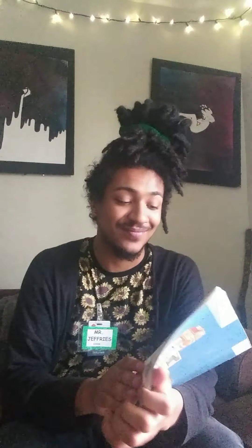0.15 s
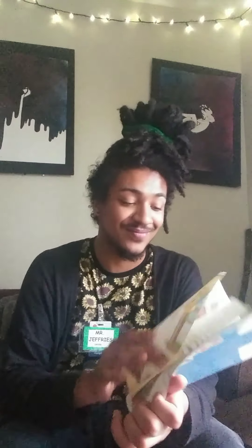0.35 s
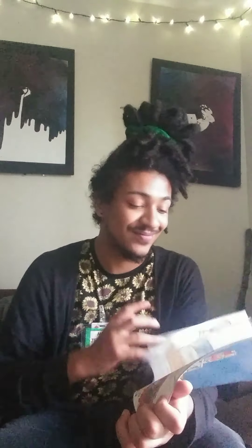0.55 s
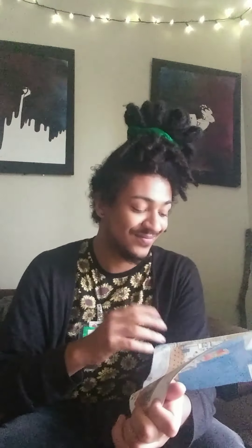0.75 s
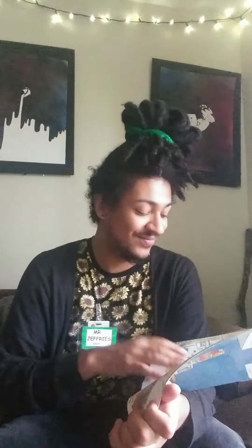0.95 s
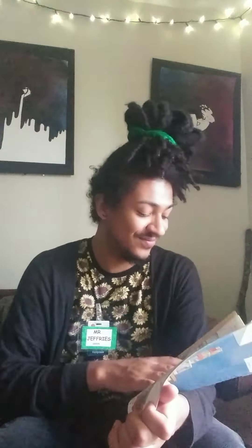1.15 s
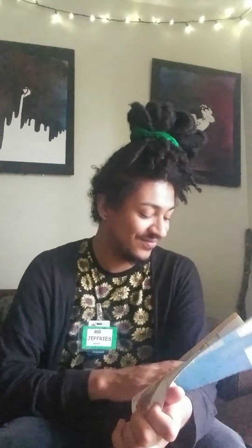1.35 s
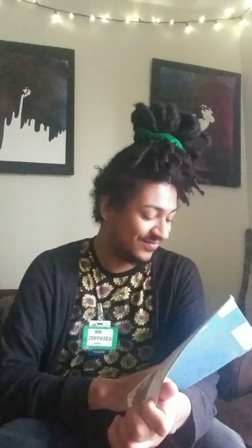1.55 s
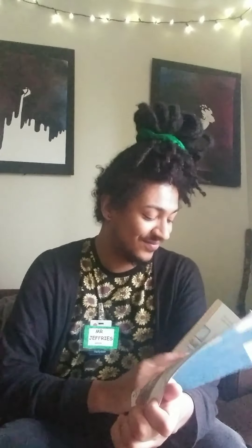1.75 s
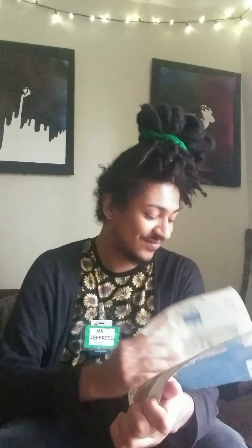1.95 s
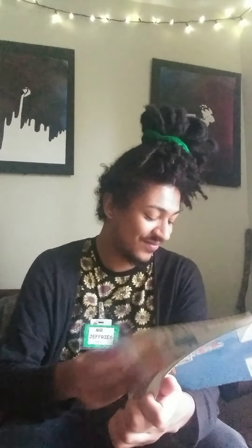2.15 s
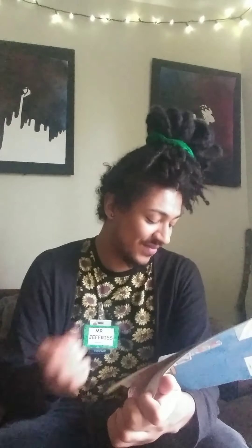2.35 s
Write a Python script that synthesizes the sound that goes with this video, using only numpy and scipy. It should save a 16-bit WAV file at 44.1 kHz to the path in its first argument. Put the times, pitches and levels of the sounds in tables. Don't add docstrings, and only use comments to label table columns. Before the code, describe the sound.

Thin book pages rustle and flap over by hand, pause with faint fingertip brushing, then a second quicker turn ends in a sharp flat crack and smoothing; small quiet room, close single microphone, low room rumble.

```python
import sys
import numpy as np
from scipy import signal
from scipy.io import wavfile
from scipy.ndimage import uniform_filter1d

SR = 44100
rng = np.random.default_rng(int(sys.argv[2]) if len(sys.argv) > 2 else 0)


def master(y):
    cut = np.clip(np.atleast_2d(y).T, -1, 1)
    pcm = np.round(cut * 32767)
    wavfile.write(sys.argv[1], SR, pcm.astype(np.int16))


def voltage_ratio(decibels):
    exponent = np.asarray(decibels, float) / 20
    return 10 ** exponent


N = 110250


def evened(x):
    return x / np.sqrt(np.mean(x ** 2) + 1e-20)


def read(points, hz):
    f, value = np.transpose(points)
    return np.interp(np.log(hz + 1), np.log(f + 1), value)


def coloured(x, points):
    size = 4096
    log_gain = np.log(voltage_ratio(read(points, abs(np.fft.fftfreq(size, 1 / SR)))))
    minimum_phase = np.exp(np.conj(signal.hilbert(log_gain)))
    taps = np.fft.ifft(minimum_phase).real[:size // 2]
    return signal.oaconvolve(x, taps)[:len(x)]


def resonate(x, hz, width_hz):
    b, a = signal.iirpeak(min(hz, SR / 2.2), max(hz / width_hz, 0.3), SR)
    return signal.lfilter(b, a, x)


def add(mix, s, sound):
    part = mix[round(s * SR):][:len(sound)]
    part += sound[:len(part)]


def slips():
    slips_per_s, spread_db = 9000, 1.5
    clump_s, clump_db = 0.0053, 1
    size = voltage_ratio(spread_db * np.minimum(rng.exponential(1, N), 2.6))
    size = size * rng.choice([-1., 1.], N)
    clump = evened(uniform_filter1d(rng.standard_normal(N), max(round(clump_s * SR), 2)))
    happens = rng.random(N) < slips_per_s / SR
    return size * happens * voltage_ratio(clump_db * clump)


def rubbing():
    # frequency in Hz, level in dB.
    rub_colour = [(400, 0.5), (1000, -1), (2000, -13.5), (4000, -4), (7000, 6.5), (10000, -1.5),
                  (13000, -9), (16000, -26)]
    flex_colour = [(400, -56), (900, -18), (1600, -5), (2600, -2.5), (3600, -1), (5500, -4.5), (9000, -27),
                   (16000, -21)]
    flap_colour = [(120, -17), (250, 17), (500, -19), (900, 13), (1500, 13), (2500, 1), (5000, -55)]
    # time in seconds, rubbing level in dB, sheet flex in dB, slack flap in dB.
    first_turn = [
        [(.114, -78.5, 5, 11), (.174, -51, 3, 9), (.204, -47, 2.5, -4), (.245, -49.5, 4.5, 14),
         (.33, -44, -1, 10), (.39, -39.5, -0.5, 0), (.47, -41, -0.5, -2), (.53, -38.5, 0, 4),
         (.548, -43.5, -2.5, 1)],
        [(.548, -43.5, -7, 8), (.585, -37.5, 1.5, 14), (.65, -41.5, 3.5, 15.5), (.685, -45, 6, -11),
         (.716, -40, 2, 15), (.75, -50, 3.5, 14), (.8, -60, 4.5, -10), (.9, -79, 3, 8)],
    ]
    fingering = [
        [(1.048, -73, 0, -5), (1.056, -57.5, -0.5, 7), (1.098, -58.5, -0.5, 8), (1.13, -65, -1, -3)],
        [(1.138, -68, 14, 0), (1.151, -51.5, 10.5, 17), (1.203, -66.5, 0.5, 2), (1.239, -66, 9, -3),
         (1.3, -100, -4, -5)],
        [(1.312, -61.5, 3.5, 17.5), (1.44, -69.5, -3, -3), (1.512, -58, -1, 9), (1.558, -65.5, 0, 4),
         (1.59, -53.5, 5.5, 2), (1.66, -62.5, 2, 0), (1.68, -57, -1, 6)],
    ]
    second_turn = [
        [(1.68, -61, -3, -1), (1.712, -43.5, 1.5, 6.5), (1.782, -43.5, 3.5, -6), (1.84, -40.5, 1, 6),
         (1.876, -37.5, 6.5, -2), (1.935, -53, 0.5, 17), (1.968, -48.5, 4, 2), (1.99, -51.5, 3, 27.5),
         (2.058, -66, 7.5, -9)],
        [(2.066, -55, -1, -6), (2.1, -46, 6.5, -1), (2.137, -46, 2.5, -13), (2.159, -40, -1.5, -9),
         (2.215, -45, -1.5, 19), (2.28, -59, 1, 2), (2.4, -94, -.5, -6)],
    ]
    flex_base_db, flap_base_db = -3, -17

    t, out = np.arange(N) / SR, np.zeros(N)
    hiss = evened(coloured(slips(), rub_colour))
    body = evened(coloured(slips(), flex_colour))
    flap = evened(coloured(slips(), flap_colour))
    air = signal.sosfiltfilt(signal.butter(3, 9300, "high", fs=SR, output="sos"), hiss)
    for stroke in first_turn + fingering + second_turn:
        s, level_db, flex_db, flap_db = np.transpose(stroke)
        gain = voltage_ratio(np.interp(t, s, level_db, left=-120, right=-120))
        air_db = np.interp(t, s, 0.34 * (level_db + 59) - 0.74 * flex_db)
        bright = hiss + (voltage_ratio(air_db) - 1) * air
        bending = voltage_ratio(flex_base_db + np.interp(t, s, flex_db)) * body
        flapping = voltage_ratio(flap_base_db + np.interp(t, s, flap_db)) * flap
        out += gain * (bright + bending + flapping)
    return out


def snap(peak_db, hz, length, crack_db):
    size, clicks_per_s = 4000, 7000
    sheet_q, snap_db = 1.55, 0.5
    t = np.arange(size) / SR
    clicks = rng.standard_normal(size) * (rng.random(size) < clicks_per_s / SR)
    clicks = clicks + 3 * (t == 0)
    clicks = clicks * np.exp(-t / max(length, 0.0005))
    sheet = resonate(clicks, hz, hz / sheet_q)
    sheet = resonate(sheet, hz, 2 * hz / sheet_q)
    crack = signal.lfilter(*signal.butter(2, [2600, 7850], "band", fs=SR), clicks)
    both = sheet / abs(sheet).max() + voltage_ratio(crack_db) * crack / abs(crack).max()
    return voltage_ratio(snap_db + peak_db) * both


def pulse(hz, cycles):
    turns = np.arange(2000) / SR * hz
    ring = -np.sin(2 * np.pi * turns) * turns * np.exp(-turns / cycles)
    return ring / abs(ring).max()


def thumps():
    # start in seconds, peak in dB, pitch in Hz.
    puffs = [(.266, -49.5, 380), (.509, -47, 630), (.574, -47, 600), (.627, -37, 510), (1.059, -51.5, 490),
             (1.139, -45.5, 226), (1.146, -49.5, 490), (1.18, -56, 426), (1.605, -50, 510),
             (1.715, -43, 356), (1.858, -34, 617), (1.975, -37, 513), (2.07, -45, 250), (2.211, -46.5, 570),
             (1.69, -48, 215), (1.995, -47, 202), (0.644, -46.5, 177), (2.085, -40, 760)]
    out = np.zeros(N)
    for s, peak_db, hz in puffs:
        add(out, s, voltage_ratio(3.5 + peak_db) * pulse(hz, 0.79))
    return out


def slaps():
    # start in seconds, peak in dB, pitch in Hz.
    cracks = [
        (2.0640, -19, 4500),
        (2.0643, -15, 1250),
        (2.0648, -13, 4800),
        (2.0652, -16, 7800),
        (2.0655, -18, 2700),
        (2.0745, -23, 3000),
        (1.9746, -27, 1300),
        (1.9750, -28, 5200),
    ]
    out = np.zeros(N)
    for s, peak_db, hz in cracks:
        add(out, s, voltage_ratio(peak_db) * pulse(hz, 0.5))
    return out


def corner_ticks():
    # start in seconds, peak in dB.
    catches = [
        (2.4838, -50),
        (2.4868, -38),
        (2.4884, -45),
        (2.4905, -36),
        (2.4938, -44),
        (2.4968, -43),
    ]
    out, size = np.zeros(N), 4000
    fade = np.exp(-np.arange(size) / SR / 0.00066)
    for s, peak_db in catches:
        tick = resonate(rng.standard_normal(size) * fade, 9450, 860)
        add(out, s, voltage_ratio(peak_db) * tick / abs(tick).max())
    return out


def buckles():
    # start in seconds, peak in dB, sheet pitch in Hz, burst
    # length in seconds, crack in dB.
    snaps = [(0.267, -29.5, 1040, 0.0056, 1), (.335, -25.5, 1180, 0.012, -2),
             (0.337, -26, 2600, 0.0075, -8), (0.4213, -30, 1260, 0.01, -22),
             (0.511, -31.5, 890, 0.025, -17), (0.574, -26.5, 900, 0.015, -21),
             (0.58, -24, 3300, 0.0073, -2), (.628, -33, 800, 0.01, 12.5),
             (.59, -29.5, 840, 0.064, -18), (0.726, -26, 2400, 0.0084, -3),
             (1.05, -59, 2500, 0.037, 6), (1.139, -37.5, 1160, 0.0066, 3.5),
             (1.155, -51, 3430, 0.005, -9), (1.318, -44.5, 2730, 0.048, -17),
             (1.603, -40.5, 1480, 0.011, 1),
             (1.71, -38, 910, 0.0035, -24), (1.768, -29, 3300, 0.0061, -14),
                  (1.8545, -25, 1790, 0.0043, -7), (1.867, -24, 1900, 0.003, -16),
                  (1.876, -36, 3930, 0.004, -3), (1.9825, -28, 3400, 0.0036, -4),
                  (2.061, -29, 2830, 0.01, -25), (2.201, -31, 1110, 0.021, -16),
                  (2.212, -29, 1170, 0.017, -16), (2.207, -30.5, 2600, 0.0097, -16),
                  (2.324, -43, 960, 0.0033, -25), (2.326, -40, 2660, 0.0038, -15)]
    out = thumps() + slaps()
    for s, peak_db, hz, length, crack_db in snaps:
        add(out, s, snap(peak_db, hz, length, crack_db))
    out = signal.sosfilt(signal.butter(2, 9000, fs=SR, output="sos"), out)
    return out + corner_ticks()


def pings():
    # start in seconds, peak in dB, pitch in Hz, length in cycles.
    patches = [(.2655, -43, 750, 0.88), (.271, -37.5, 1070, 1.2), (.279, -40, 1390, 3),
               (.294, -43, 1470, 3.7), (.345, -34.5, 2470, 3.9), (.346, -33.5, 3070, 4.6),
               (.352, -39, 1220, 2.7), (.364, -37, 1530, 3), (.509, -38, 500, 0.49), (.519, -37, 890, 1.5),
               (.529, -38, 704, 1.9), (.575, -26.5, 2320, 1.5), (.581, -36, 1070, 1.1),
               (.624, -37.5, 700, 1.9), (.696, -39.5, 583, 1.1), (.727, -36.5, 1290, 0.95),
               (.728, -31, 4030, 3.2), (1.772, -34.5, 1800, 1.5), (1.8575, -24, 3700, 2.2),
               (1.9748, -28, 3020, 0.83), (2.206, -40, 3230, 1.6), (2.218, -41, 2450, 1.6),
               (0.42, -36, 1900, 1.1), (0.426, -27.5, 1280, 1.2), (.432, -34, 1160, 1.5),
               (0.4496, -39, 1420, 1.7), (.340, -35, 1240, 1.6), (.5825, -28, 4220, 3.8),
               (.585, -28.5, 3570, 3.4), (.587, -33, 1110, 0.66), (0.6073, -41, 1290, 1.5),
               (0.64, -33, 1630, 0.81), (.714, -39, 2330, 1.8), (1.051, -53, 436, 1.2),
               (1.059, -52, 2410, 3.1), (1.081, -54, 2600, 4.4), (1.087, -56, 2550, 4.6),
               (1.098, -59, 2530, 7.3), (1.186, -45.5, 820, 1.1), (1.317, -50, 2776, 7),
               (1.347, -58, 2520, 15), (1.576, -49, 4650, 3), (1.8667, -23, 3800, 1.8),
               (1.868, -34, 5300, 4.4), (1.882, -29, 4040, 5.3), (1.9758, -30, 1880, 1.3),
               (1.986, -32, 1260, 0.89), (1.987, -32.5, 3800, 3.3), (2.0717, -21.5, 2675, 2.9),
               (2.074, -23, 4330, 3.3)]
    out = np.zeros(N)
    for s, peak_db, hz, cycles in patches:
        add(out, s, voltage_ratio(peak_db) * pulse(hz, max(cycles, 0.3)))
    return out


def reply(walls_db):
    # delay in seconds, smear in seconds, level in dB.
    walls = [
        (.002, .002, -12),
        (.0078, .006, -7),
        (.019, .016, -14),
    ]
    # frequency in Hz, time to fall 60 dB in seconds.
    decay = [(300, 0.31), (1000, 0.21), (3000, 0.27), (8000, 0.19), (14000, 0.25)]
    size, tail_db = SR // 2, -13
    t = np.arange(size) / SR
    hz, frames, z = signal.stft(rng.standard_normal(size), SR, nperseg=256)
    fading = z * voltage_ratio(-60 * frames / read(decay, hz)[:, None])
    tail = signal.istft(fading, SR, nperseg=256)[1][:size]
    tail = tail * np.clip(t / 0.042, 0, 1)
    taps = voltage_ratio(tail_db) * tail / np.linalg.norm(tail)
    dull = signal.butter(2, [2000, 7000], "band", fs=SR)
    for delay, smear, db in walls:
        echo = rng.standard_normal(size) * (t > delay)
        echo = echo * np.exp(-np.maximum(t - delay, 0) / smear)
        echo = signal.lfilter(*dull, echo)
        taps = taps + voltage_ratio(db + walls_db) * echo / np.linalg.norm(echo)
    return taps


def room(x, walls_db):
    drift_per_s = 3
    turn = 2 * np.pi * drift_per_s * np.arange(N) / SR
    out = x
    for share in (np.cos(turn), np.sin(turn)):
        out = out + signal.fftconvolve(x * share, reply(walls_db))[:N]
    return out


def rumble():
    # frequency in Hz, level in dB per Hz.
    noise_colour = [(24, -73), (40, -3), (146, -9), (229, -8), (359, -9.5), (397, -13), (797, -13),
                    (1520, -22.5), (15500, -33.5)]
    # frequency in Hz, width in Hz, level in dB.
    modes = [(227.6, 12.8, -61), (293.2, 29, -68), (811, 20, -75), (900, 75, -70)]
    out = voltage_ratio(-62.5) * evened(coloured(rng.standard_normal(N), noise_colour))
    for hz, width_hz, db in modes:
        out = out + voltage_ratio(db) * evened(resonate(rng.standard_normal(N), hz, width_hz))
    return out


def split_treble():
    # centre in seconds, top frequency in Hz, level in dB.
    puffs = [
        (.4040, 13800, -48.5),
        (.4737, 12400, -53),
    ]
    length = 0.0464
    out, size = np.zeros(N), round(length * SR)
    for s, top_hz, db in puffs:
        band = signal.butter(8, [11000, top_hz], "band", fs=SR, output="sos")
        hiss = evened(signal.sosfilt(band, rng.standard_normal(size)))
        add(out, s - length / 2, voltage_ratio(db) * np.hanning(size) * hiss)
    return np.outer([1, -1], out)


def scene():
    rub_walls_db = -12.5
    pages = room(rubbing() + pings(), rub_walls_db) + room(buckles(), 0)
    pages = signal.sosfilt(signal.butter(2, 176, "high", fs=SR, output="sos"), pages)
    return np.tile(pages + rumble(), (2, 1))


def low_pass(x):
    return signal.sosfilt(signal.butter(12, 15700, fs=SR, output="sos"), x)


def record(dry):
    # frequency in Hz, level in dB.
    mic_colour = [(4500, -1.5), (5450, 2.5), (5900, -5), (6350, -13.5), (7100, -4.5), (7950, 8),
                  (8700, 1.5)]
    mono = coloured(dry[0], mic_colour)
    mono = mono + voltage_ratio(-73) * rng.standard_normal(N)
    mono = signal.lfilter(*signal.butter(3, 92, "high", fs=SR), mono)
    top_edge = signal.firwin(511, 15650, window=("kaiser", 9), fs=SR)
    mono = signal.oaconvolve(mono, top_edge, "same")
    mix = np.tile(mono, (2, 1)) + split_treble()
    return low_pass(mix)


dry = scene()
out = record(dry)
master(out)
```